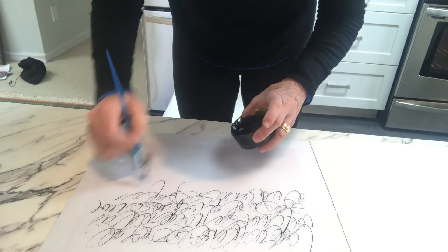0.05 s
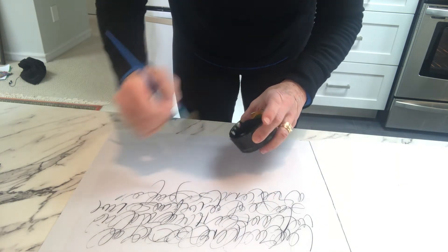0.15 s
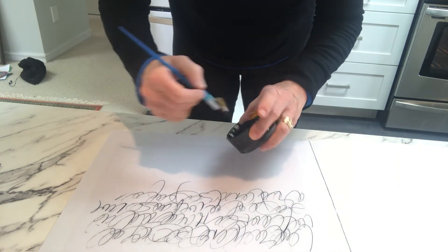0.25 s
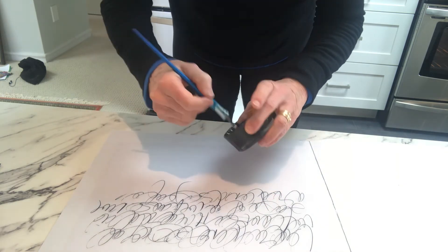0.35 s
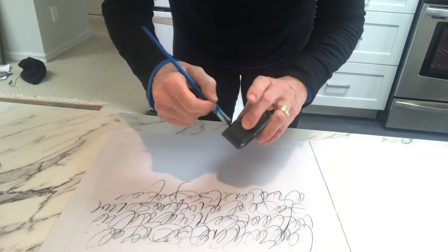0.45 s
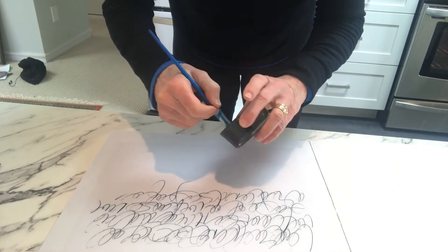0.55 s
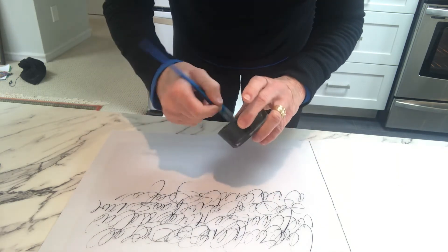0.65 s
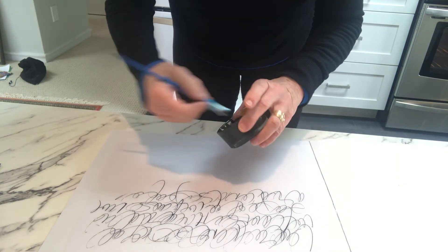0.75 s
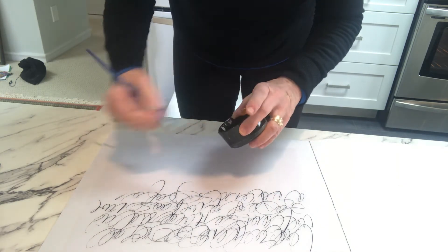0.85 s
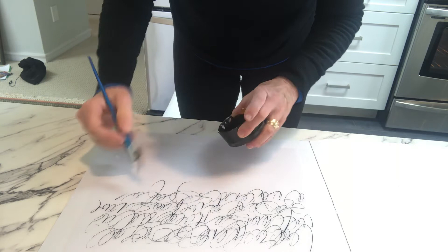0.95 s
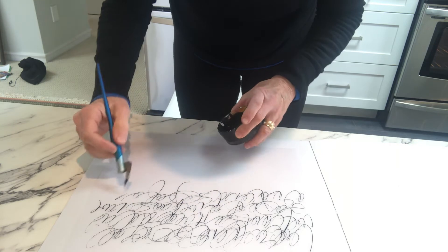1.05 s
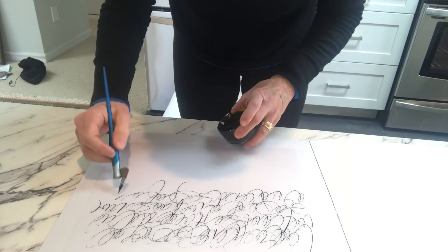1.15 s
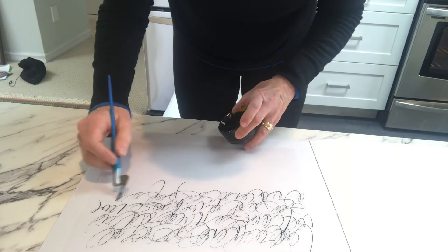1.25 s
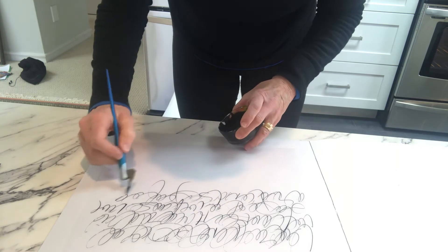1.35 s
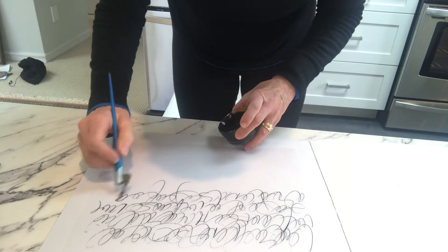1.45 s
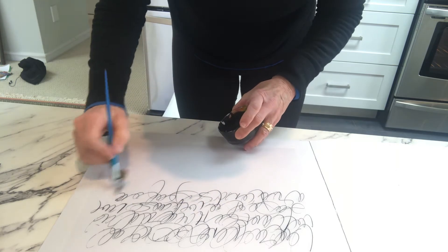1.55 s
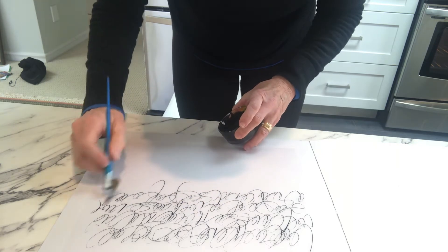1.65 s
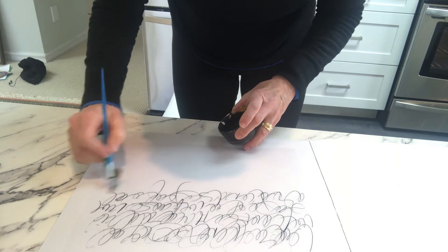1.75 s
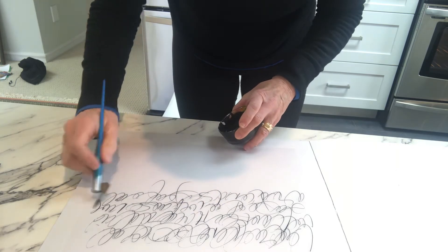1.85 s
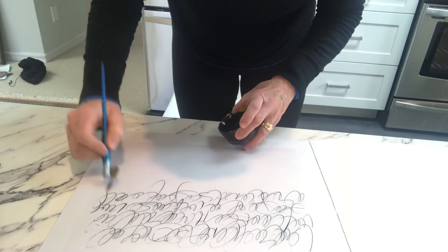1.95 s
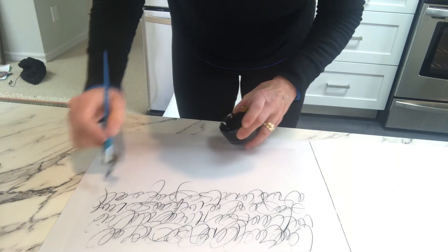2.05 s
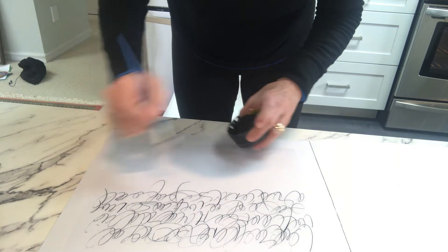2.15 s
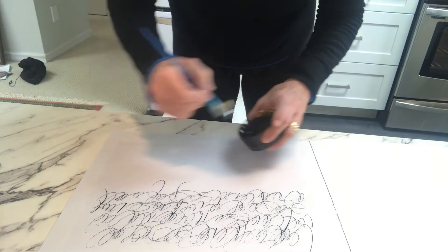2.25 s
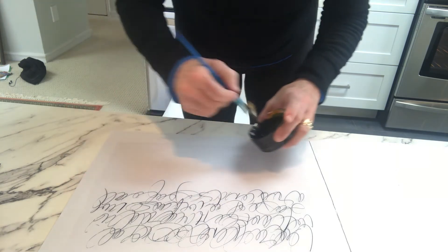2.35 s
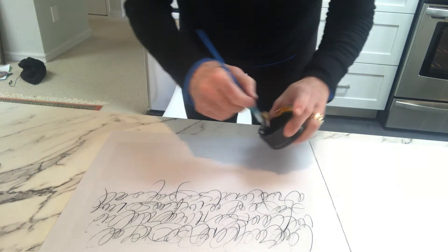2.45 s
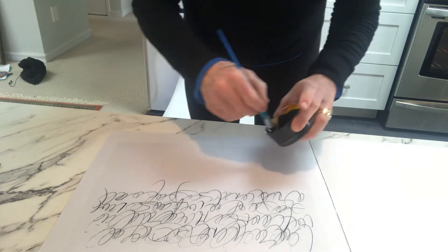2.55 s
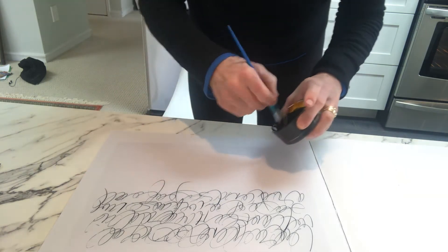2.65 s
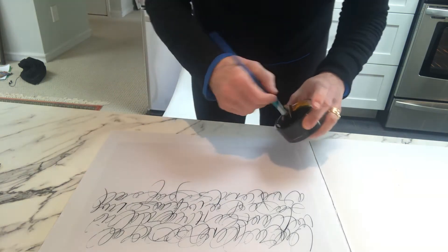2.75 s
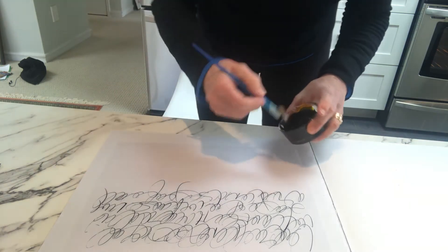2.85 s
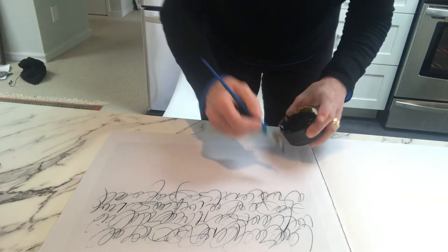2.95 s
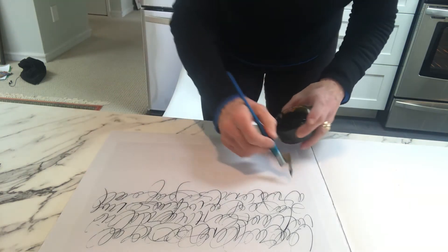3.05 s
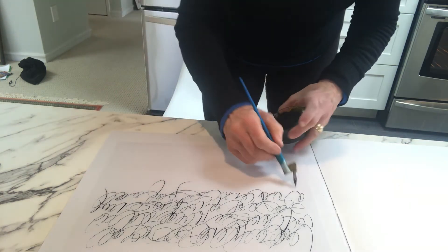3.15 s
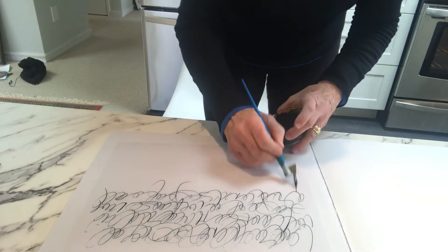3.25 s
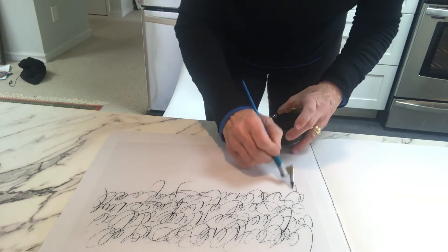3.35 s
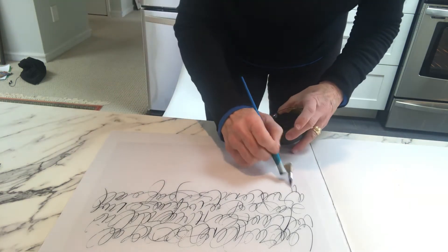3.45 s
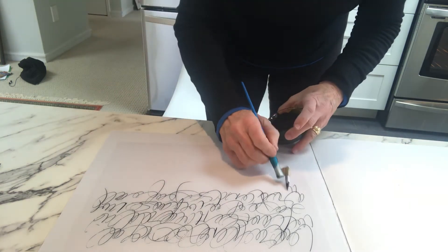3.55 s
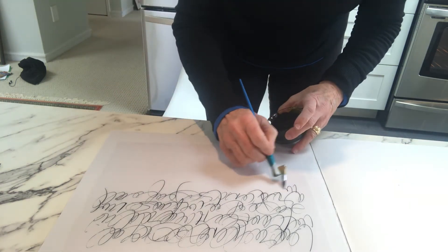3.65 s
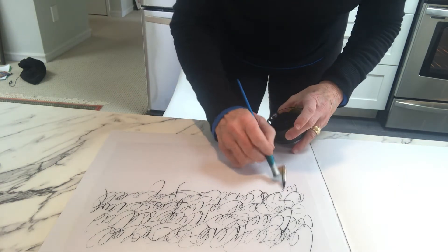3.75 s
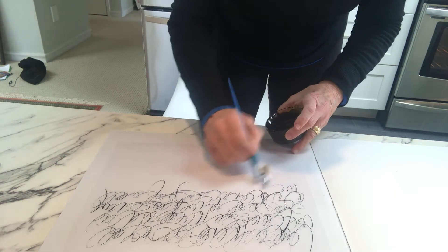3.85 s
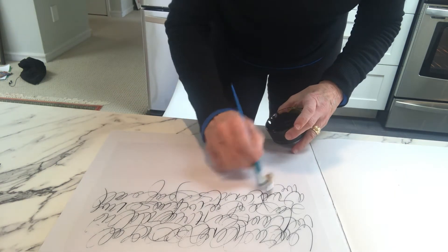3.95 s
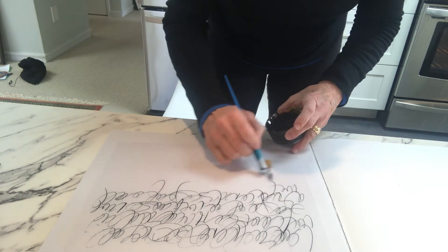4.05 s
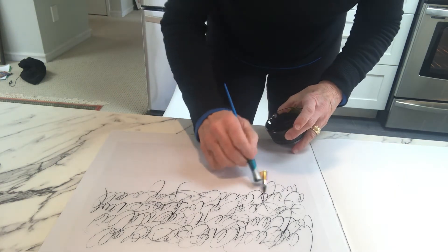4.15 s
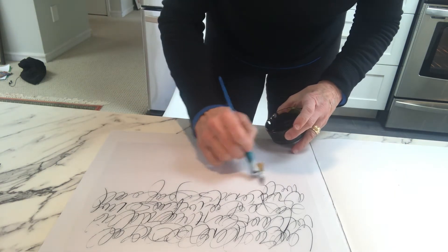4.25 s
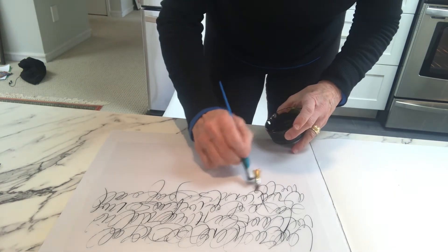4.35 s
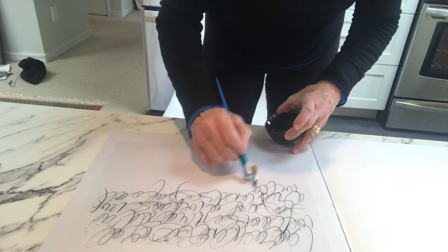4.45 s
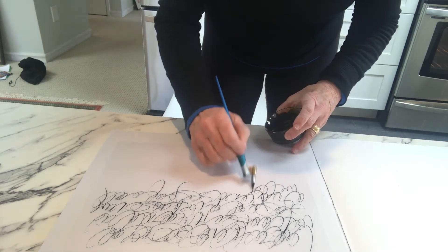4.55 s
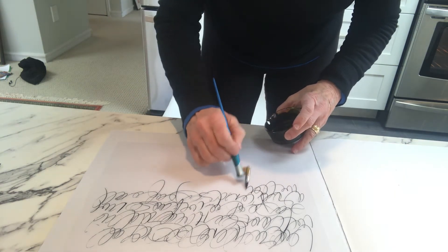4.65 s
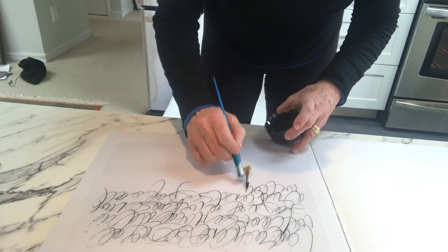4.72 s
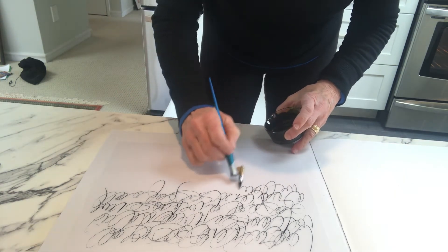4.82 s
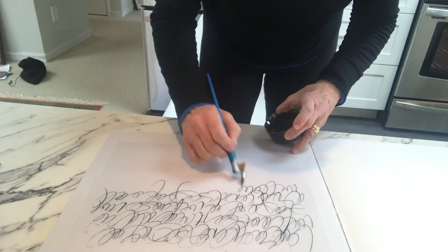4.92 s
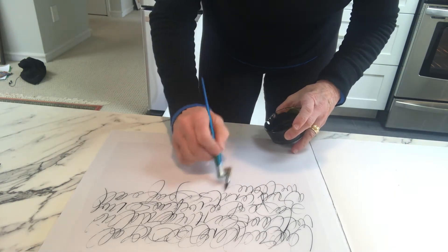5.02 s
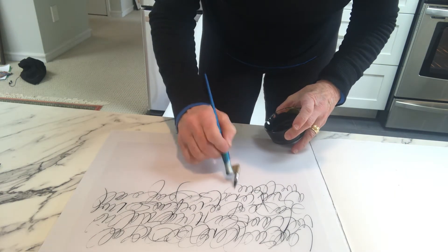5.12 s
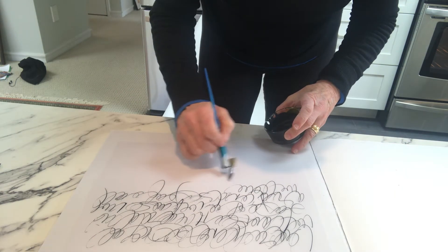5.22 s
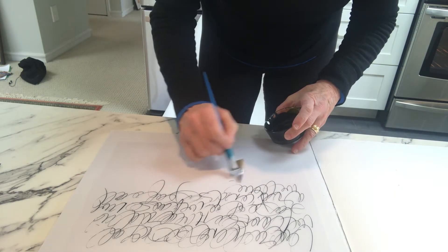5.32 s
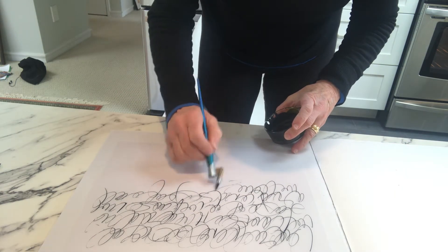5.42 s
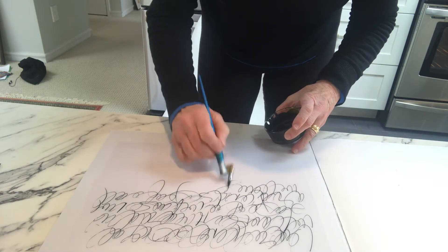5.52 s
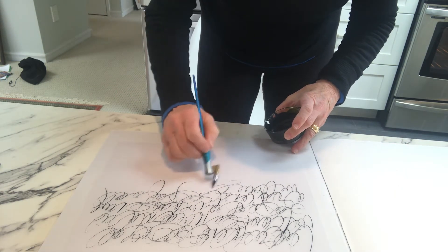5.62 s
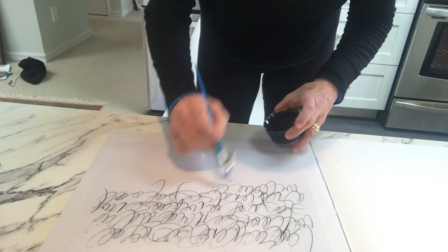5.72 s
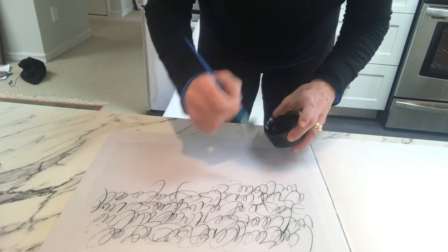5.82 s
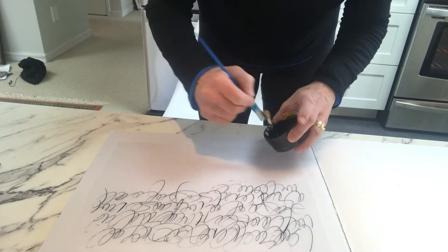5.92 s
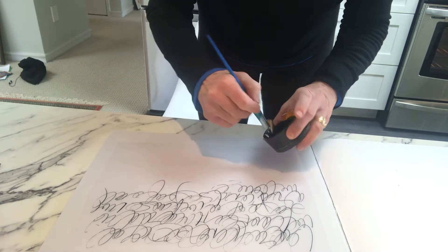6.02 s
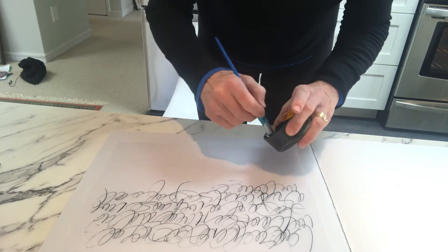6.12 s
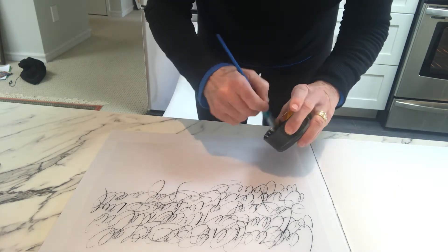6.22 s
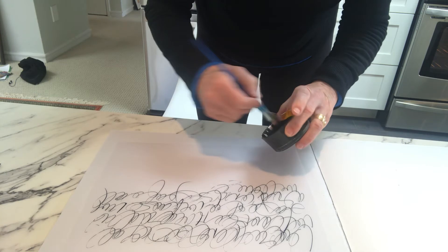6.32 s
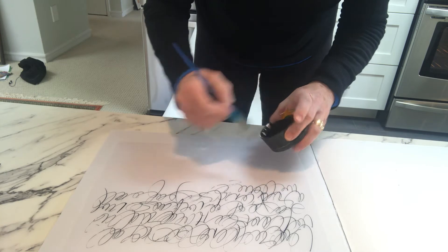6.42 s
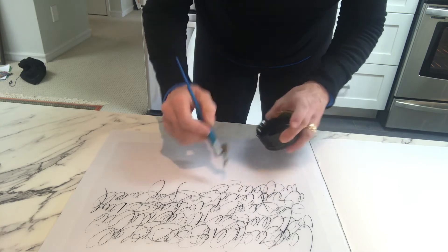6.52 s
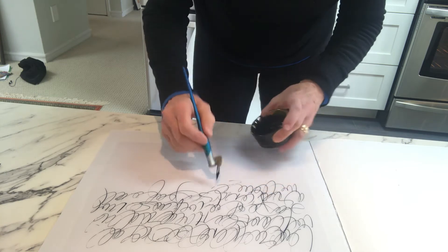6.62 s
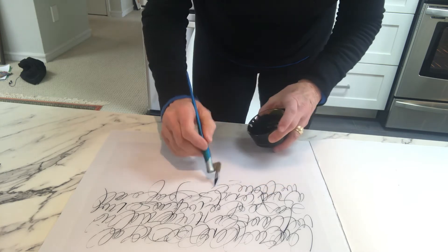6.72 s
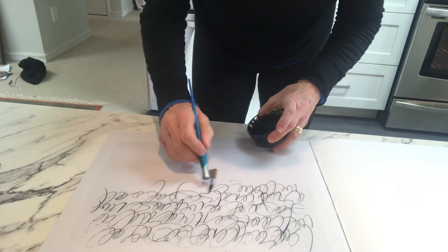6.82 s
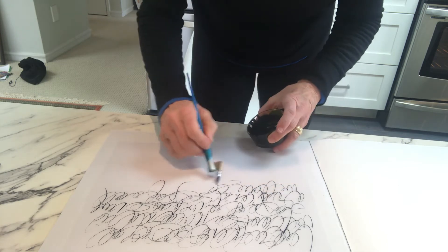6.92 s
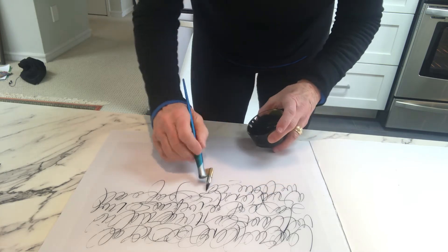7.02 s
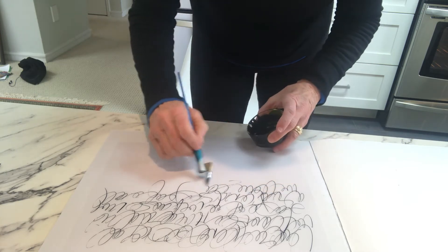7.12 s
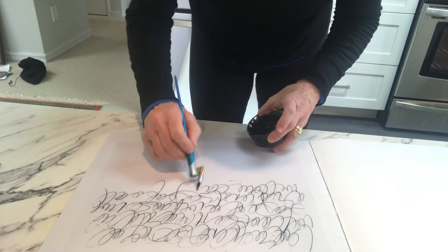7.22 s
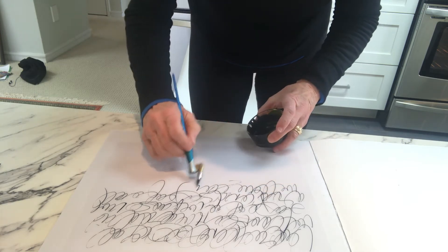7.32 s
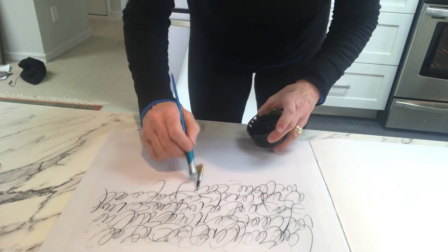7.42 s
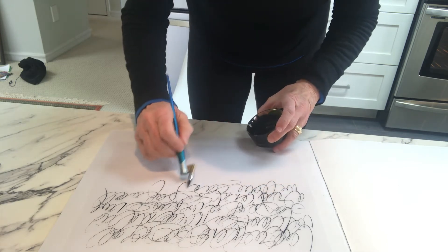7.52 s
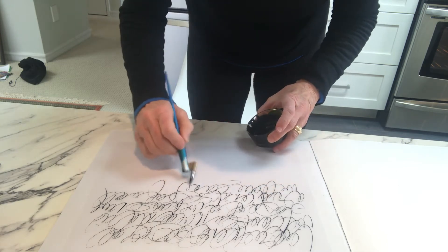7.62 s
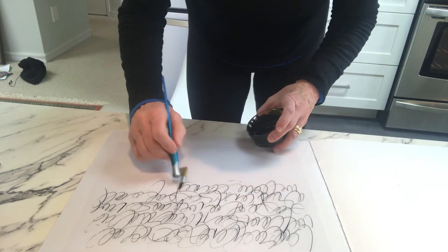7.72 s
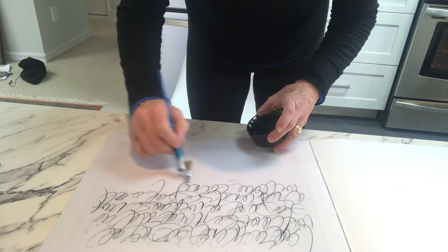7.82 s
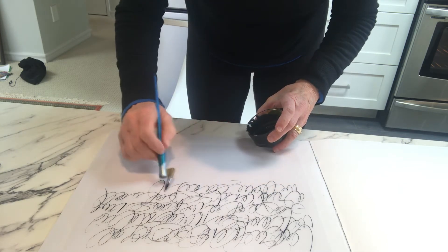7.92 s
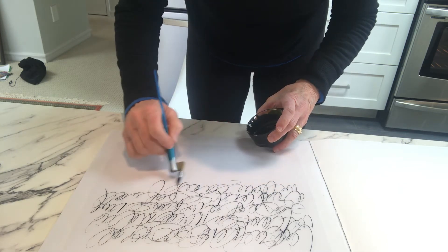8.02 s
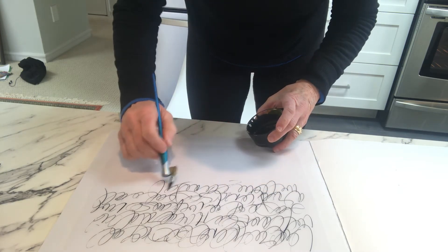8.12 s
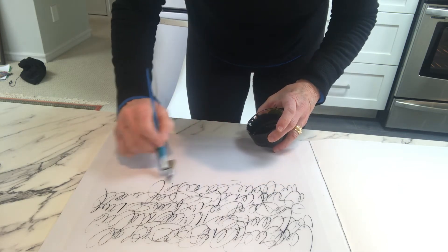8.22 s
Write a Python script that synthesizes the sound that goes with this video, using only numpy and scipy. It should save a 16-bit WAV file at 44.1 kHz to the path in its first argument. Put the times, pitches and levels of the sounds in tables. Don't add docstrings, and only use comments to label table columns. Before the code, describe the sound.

A quiet kitchen with soft low room air and distant appliance hum, captured close at a stone counter. At 0 s a very faint last touch of nib on paper, then near silence until small clinks and a dull scrape on an ink pot around 0.5-0.6 s. From 1.2 to 1.95 s the steel nib scribbles quick loops: short raspy strokes with a hollow midrange hum, gritty hiss, ticks and tiny stick-and-jump chirps. A soft sleeve swish passes at 2.25 s, and sharper, briefly ringing pot clinks fall at 2.5-2.65 s. From 3.2 to 5.6 s comes the longest run, five to ten uneven strokes per second, getting slightly brighter. A pause, then rattling taps on the pot at 6.1-6.25 s, the hardest at 6.2. Scribbling resumes at 6.75 s, lighter and steady, continuing to about 8.25 s. Reflections are short and faint.

```python
import sys
import numpy as np
from scipy import signal
from scipy.fft import rfft, irfft, next_fast_len
from scipy.io import wavfile
from scipy.ndimage import uniform_filter1d

SR = 44100
rng = np.random.default_rng(int(sys.argv[2]) if len(sys.argv) > 2 else 0)


def master(y):
    cut = np.clip(np.atleast_2d(y).T, -1, 1)
    pcm = np.round(cut * 32767)
    wavfile.write(sys.argv[1], SR, pcm.astype(np.int16))


def invert_db(level):
    return 10 ** (np.asarray(level, dtype=float) / 20)


N = 364707

# frequency in Hz, level in dB per Hz.
AIR = [(13, -63), (22, -32), (49, -8), (70, -3), (92, -8), (164, -7.5), (194, -7), (408, -11), (669, -15),
       (835, -15.5), (1370, -19), (1620, -22), (2440, -24.5), (12100, -36), (15900, -39.5)]
AIR_DB = -66
# centre in Hz, width in Hz, change in dB.
MIC_DIPS = [(5000, 500, -3), (10550, 800, -4.5)]
# pitch in Hz, width in Hz, level in dB.
HUM = [(69, 6, -76), (415, 4, -77.5)]
# frequency in Hz, time to fall 60 dB in seconds.
ROOM = [(500, 1), (1300, 0.3), (4000, 0.29), (12000, 0.18)]
EDGE_HZ = 15830

# time in seconds, rise in ms, fall in ms, level in dB.
SWISHES = [
    (2.263, 76, 76, -60),
    (2.9, 25, 47, -80),
    (.25, 80, 80, -103),
    (5.8, 49, 280, -78),
]
# frequency in Hz, level in dB per Hz.
CLOTH = [(470, -35), (800, -8), (965, 2), (1050, -14), (1210, -1.5), (5360, -7), (15900, -20.5)]

# start in seconds, rasp in dB, pot ring in dB, contact in ms.
CLINKS = [(.501, -59, -82, 4), (.508, -50, -64, 3.1), (0.575, -55, -76, 25), (.604, -50, -78, 4.5),
          (2.504, -51, -62, 5.6), (2.51, -60, -74, 3.8), (2.5336, -46, -34, 4.5), (2.535, -41, -66, 8.9),
          (2.603, -56.5, -87, 25), (2.625, -49, -53, 1.7), (2.652, -65, -62.5, 19), (2.742, -76, -69, 6.5),
          (6.108, -49.5, -79, 4), (6.157, -59, -73, 3.2), (6.176, -48, -60, 7.8),
          (6.2019, -35.5, -34.5, 4.3), (6.21, -44, -43.5, 12), (6.238, -54, -57, 19), (6.325, -76, -66, 24)]
POT_HZ = [3526, 3524, 3552, 6090, 7470, 3020]
# level in dB, time to fall 60 dB in seconds.
POT_MODES = [(7.5, 0.062), (-17, 0.52), (-33, .2), (-22, .12), (-24, .09), (-24, .2)]
# frequency in Hz, level in dB per Hz.
RASP = [(1200, -12), (2500, 14), (4000, 10.5), (8000, 10.5), (15900, 9)]
# frequency in Hz, width in Hz, rise in dB.
RIM = [(3550, 250, 6), (4450, 250, 7), (6110, 250, 11), (7650, 300, 10), (9000, 300, 5), (10900, 400, 9),
       (13900, 400, 8), (15400, 400, 7)]
# start in seconds, pitch in Hz, level in dB, contact in ms.
CLACKS = [(.578, 6130, -67, 33), (.578, 4400, -69, 16), (.578, 7500, -66, 22), (.606, 11200, -63, 3.7),
          (2.504, 2810, -53.5, 2.8), (2.507, 2580, -63, 3.2), (2.536, 2980, -48.5, 8.2),
          (2.504, 6100, -64, 7.1), (2.504, 7000, -62, 5.5), (2.504, 4370, -68, 6), (2.537, 7060, -57, 6),
          (6.177, 5900, -62, 6), (2.538, 6070, -44.5, 4.5), (2.624, 2780, -53, 2.5), (2.625, 3555, -42, 4),
          (2.625, 2290, -61, 2.6), (2.625, 1460, -58.5, 4.2), (2.61, 7460, -63, 22), (2.882, 1170, -69, 33),
          (6.163, 2170, -69, 6.4), (6.169, 2370, -59, 5.4), (6.177, 2560, -48.5, 4.7),
          (6.177, 7600, -59, 6), (6.177, 10600, -67, 5), (6.203, 990, -65, 7.3), (6.108, 3850, -62, 6),
          (6.108, 3050, -65, 6), (6.235, 7400, -62, 18), (6.255, 4550, -64, 12), (6.209, 4490, -51, 9.6),
          (6.213, 6070, -48.5, 5.1), (6.243, 7000, -58.5, 18), (6.238, 10600, -65, 15)]
# start in seconds, pitch in Hz, level in dB, contact in ms.
SCUFFS = [
    (.505, 1400, -59, 11),
    (.501, 6700, -57, 4.4),
    (.553, 1300, -62, 25),
    (.572, 895, -54, 30),
    (.585, 2200, -62, 25),
    (.577, 1425, -54.5, 34),
    (1.164, 5040, -50, 16),
    (6.201, 4040, -38, 6.4),
]
NOTE_WIDTH_HZ, NOTE_DAMPING = 144, 0.013
SCUFF_WIDTH_HZ, SCUFF_DAMPING = 340, 0.23

# time of top speed in seconds, length in ms,
# pressure in dB, scratch in dB re pressure.
BITES = [(.004, 18, -59.5, -6.5), (.04, 76, -68.5, -8), (1.336, 35, -40.5, -8), (1.423, 35, -45.5, -6.5),
         (1.577, 27, -47.5, -28), (1.637, 55, -46, -3.5), (1.722, 42.5, -40.5, -5), (3.253, 28.4, -41, -10),
         (3.33, 32, -40.5, -9), (3.424, 31, -49.5, -8.5), (3.969, 56, -49.5, 2.5), (4.067, 28, -36.5, -10),
         (4.11, 26, -44.5, -8), (4.192, 62, -44.5, -11), (4.554, 37, -46, -11), (4.728, 50, -49, -11.5),
         (4.899, 55, -47, -11), (5.08, 42, -46, -8.5), (5.24, 39, -45.5, -9.5), (5.406, 19, -41.5, -9),
         (6.733, 11, -71, 5), (6.765, 38, -43, -13.5), (7.068, 26, -47.5, -12), (7.242, 26.5, -45, -15),
         (7.417, 28, -47.5, -10.5), (7.591, 31, -48.5, -10.5), (8.154, 42, -50, -6.5)]
LOOPS = [(1.25, 35, -44, -5.5), (1.53, 40.3, -39.5, -5.5), (1.837, 43, -45, -16), (1.888, 41, -60.5, 13),
         (3.203, 7.7, -55.5, -7), (3.518, 30.5, -38.5, -17.5), (3.814, 36, -41, -15.5),
         (3.848, 49, -52, 4.5), (4.014, 72, -45, -23), (4.271, 23, -43, -7.5), (4.278, 44, -39.5, -16.5),
         (4.374, 31, -42.5, -13.5), (4.463, 31, -40, -14), (4.635, 30, -39.5, -16.5),
         (4.801, 36, -41.5, -14), (4.988, 31, -48, -4), (5.019, 19.5, -40, -13.5), (5.362, 28.5, -36, -9),
         (5.457, 27, -44.5, -18), (5.491, 34, -45, -7.5), (5.583, 32, -43, -6), (5.699, 12, -70, -0.5),
         (6.871, 27.4, -43, -9.5), (6.963, 43.4, -44.5, -12), (7.34, 30, -45, -14.5),
         (7.685, 39.4, -41, -13), (7.867, 45.4, -40.5, -8.5), (7.984, 27.7, -44.5, -8),
         (8.068, 26, -39.5, -12), (8.239, 30, -42, -7.5)]
STOPS = [(1.218, 30, -50, -11), (1.79, 41, -55, 4), (1.932, 9.3, -50.5, 0), (3.477, 28, -51, -17),
         (3.665, 37, -40, -17.5), (3.763, 31, -47, -12), (5.178, 28.5, -45, -6.5),
         (7.169, 47.5, -43, -12.5), (7.513, 54, -42, -13), (7.794, 34, -51.5, -8), (8.216, 37, -48, -27)]
BITE_RISE, LOOP_RISE, STOP_FALL = 0.35, 0.86, 0.49
SQUARENESS = 2.84
# start in seconds, end in
# seconds, second bend in dB at the start, the same at the end, lean on the counter in dB.
RUNS = [
    (0, .1, 2, -12, -1),
    (1.16, 1.953, -15, -0.5, 2.5),
    (3.19, 5.724, -20.5, -1.5, 1),
    (6.733, 8.27, -9.5, -2, 1),
]
EASE_DB = -4.5

# time in seconds, unloaded first bend in Hz,
# tilt from -1 (flat and heavy) to +1 (steep and light).
GRIP = [(.1, 1230, -0.74), (1.4, 1294, -0.068), (1.7, 1270, 0.032), (1.96, 1410, -0.39),
        (3.18, 1220, -0.56), (3.6, 1250, -0.12), (4.03, 1303, 0.63), (4.18, 1350, 0.06), (4.32, 1330, 0.44),
        (4.7, 1330, -0.11), (5.0, 1370, 0.51), (5.6, 1310, 0.79), (6.72, 1300, 0.62), (7.1, 1310, 0.73),
        (7.27, 1390, -0.0046), (7.6, 1310, 0.11), (7.9, 1330, 0.57), (8.15, 1383, -0.045)]
# time in seconds, swing from 0 to 1.
TOPS = [(1.03, 0.3), (1.252, 0.8), (1.487, 0.4), (1.681, 0), (1.941, 0.8), (3.268, 0.22), (3.452, 0.2),
        (3.649, 0.1), (3.826, 0.5), (3.986, 0), (4.111, 0.2), (4.255, .6), (4.45, 0.3), (4.629, 0.64),
        (4.77, 0.55), (4.954, 0), (5.178, 0.23), (5.353, 0), (5.567, 0.5), (5.76, 0.7), (6.66, 1),
        (6.86, 0.5), (7.11, 0.3), (7.275, 0.05), (7.47, 0.63), (7.643, 0.95), (7.837, 0.74), (7.99, 0.1),
        (8.221, 0.65), (8.4, .8)]
SWING_HZ, SWING_LEAD_TURNS, SWING_TILT = 110, 0.084, 0.92
SAG_HZ, FULL_PRESSURE_DB = 47, -39

BEND_WIDTHS_HZ = (205, 796)
BEND_FLOOR_HZ = 1157
SECOND_HZ, SECOND_TILT_HZ, SECOND_TILT_DB = 1760, 166, 4.5
# frequency in Hz, level in dB per Hz.
PAPER_BODY = [(120, -4), (300, -0.5), (550, -2), (900, 6), (1450, 10.5), (2400, -13.5), (3500, -33)]
WEIGHT_DB, WEIGHT_TILT_DB = -13, -7
# frequency in Hz, level in dB per Hz.
SCRATCH = [(1470, -78), (2600, -7), (3130, -7.5), (3620, -8), (3950, -8.5), (4790, -11.5), (6040, -10),
           (9470, -20.5), (10100, -17.5), (11900, -15.5), (15900, -24)]
TINES_HZ = [3110, 3500, 3930, 4550, 5520, 6110, 6960, 7600, 10330, 11750, 12100, 12800, 13400, 15600]
TINES_NEAR_DB = [0, 1, 4, 2, 3.5, 6, 5, 2, 5.5, 6, 6.5, 5.5, 5.5, 6]
TINES_FAR_DB = [0, 4, 7.5, 5.5, 1, 7, 4.5, 6, 5.5, 6, 5, 3, 3, 5]
TINE_WIDTH_HZ, STRETCHED_UNTIL_S = 200, 2.5
BRIGHT_DB_PER_OCTAVE = 4.5
# time in seconds, pitch in Hz, level in dB re pressure.
TWIST = [(1.25, 3200, -25), (1.53, 3190, -18), (1.9, 3180, -32), (3.3, 3120, -17.5), (3.52, 3050, -20),
         (3.8, 3010, -23), (3.98, 3000, -17), (4.08, 3100, -27.5), (4.8, 3140, -20), (5.0, 2980, -22),
         (5.25, 3070, -15.5), (5.37, 3020, -20), (5.59, 3010, -9.5), (6.77, 2980, -24), (7.3, 3030, -19),
         (7.68, 3020, -24.5), (7.87, 3030, -19), (8.23, 3030, -16.5)]
# time in seconds, pitch in Hz, level in dB re pressure.
CLIP = [(1.25, 1850, -19), (1.53, 1950, -13.5), (1.73, 2010, -11.5), (1.92, 2010, -9), (3.3, 2040, -18),
        (3.8, 2150, -21), (4.08, 2180, -13), (4.28, 2160, -19), (4.47, 2090, -12), (4.801, 2080, -19),
        (5.17, 2130, -14), (5.37, 2110, -26), (5.6, 2050, -18), (6.8, 2010, -20), (7.3, 2030, -15),
        (7.68, 2000, -15.5), (7.88, 2010, -24), (8.23, 1950, -9)]
TWIST_WIDTH_HZ, CLIP_WIDTH_HZ = 530, 340

# start in seconds, tick in dB, hum in dB.
SNAGS = [(1.166, -56, -74), (1.184, -49, -47.5), (1.2132, -52, -38), (1.3239, -41, -61), (3.196, -59, -62),
         (3.2312, -39, -42.5), (3.253, -41, -35), (3.32, -52, -34), (3.3649, -51, -33), (3.375, -45, -33),
         (3.442, -43, -53), (3.503, -61, -29.5), (3.813, -52, -33.5), (3.818, -52, -30), (4.062, -40, -29),
         (5.2309, -45, -36), (5.319, -59, -39), (5.4488, -51, -35), (5.6994, -66, -70), (6.7344, -63, -65),
         (6.7521, -60, -37.5), (7.0474, -53, -42), (7.231, -56, -41.5), (1.417, -56, -41),
         (3.645, -56, -32.5), (3.749, -41, -37.5), (4.243, -54, -39), (5.155, -53, -43), (4.433, -54, -41),
         (4.612, -54, -41), (3.489, -57, -38), (3.796, -54, -35.5), (7.401, -58, -42), (7.829, -54, -37.5)]
# start in seconds, level in dB, pitch in Hz.
SLIPS = [(1.2616, -44, 1350), (1.3297, -33, 1213), (1.3544, -34, 1250), (1.5007, -33, 1300),
         (1.5115, -38, 1370), (1.5472, -37, 1290), (1.5586, -46, 1360), (1.578, -35.5, 1380),
         (1.669, -43, 1360), (1.713, -36, 1260), (1.842, -44, 1510), (3.3275, -45, 1200),
         (3.5107, -33, 1290), (3.5472, -33, 1300), (3.6597, -35, 1313), (3.8563, -38, 1294),
         (3.9928, -37, 1370), (4.0756, -47, 1240), (4.177, -42, 1330), (4.255, -39, 1370),
         (4.2635, -31, 1335), (4.2835, -30, 1330), (4.297, -37, 1345), (4.306, -37, 1350),
         (4.388, -43, 1400), (4.4622, -42, 1340), (4.4722, -33.5, 1290), (4.6455, -40, 1306),
         (4.7968, -32, 1295), (4.8212, -36, 1284), (4.9815, -36.5, 1255), (5.014, -43, 1380),
         (5.03, -44, 1335), (5.2601, -39, 1450), (5.3272, -39, 1347), (5.3376, -33, 1290),
         (5.3482, -38, 1330), (5.3599, -31, 1370), (5.3713, -31, 1266), (5.4015, -33, 1294),
         (5.4286, -35, 1310), (5.5126, -40, 1440), (5.571, -34.5, 1440), (5.6213, -41.5, 1370),
         (6.9534, -36, 1290), (6.9596, -38, 1276), (6.9666, -38, 1246), (6.9942, -39, 1246),
         (7.1845, -36, 1320), (7.2455, -41, 1386), (7.328, -39, 1360), (7.3537, -40, 1420),
         (7.5359, -36.5, 1225), (7.683, -38, 1430), (7.703, -38, 1410), (7.836, -37, 1450),
         (7.866, -42, 1325), (8.048, -43, 1410), (8.0752, -49, 1360), (8.0959, -42, 1245)]
SLIP_RISE_S = 0.0029
STICK_MS, STICK_SHARE = 4.3, 0.42
JOLT, JOLT_MS = 0.35, 2.45
PULL, PULL_MS = 0.67, 11


def evened(x):
    return x / np.sqrt(np.mean(x ** 2) + 1e-20)


def peaked(x):
    return x / abs(x).max()


def read(points, hz):
    f, value = np.transpose(points)
    return np.interp(np.log(hz + 1), np.log(f + 1), value)


def coloured(x, points, peaks=()):
    size = next_fast_len(N)
    hz = np.fft.rfftfreq(size, 1 / SR)
    db = read(points, hz)
    for f, width, rise_db in peaks:
        db = db + rise_db / (1 + (2 * (hz - f) / width) ** 2)
    return evened(irfft(rfft(x, size) * invert_db(db), size)[:N])


def resonate(x, hz, width):
    turn = np.exp(2j * np.pi * np.cumsum(hz * np.ones(len(x))) / SR)
    r = np.exp(-np.pi * width / SR)
    return 2 * (turn * signal.lfilter([1 - r], [1, -r], x / turn)).real


def twice(x, hz, width):
    return resonate(resonate(x, hz, width), hz, width)


def swells(s, rise_ms, fall_ms, db):
    t = np.arange(0, N + 32, 32) / SR
    late = t - s[:, None]
    spread = np.where(late < 0, rise_ms[:, None], fall_ms[:, None]) / 1000
    bells = np.exp(-abs(late / spread) ** SQUARENESS)
    power = (invert_db(db)[:, None] ** 2 * bells).sum(0)
    return np.interp(np.arange(N) / SR, t, np.sqrt(power))


def add(mix, s, sound):
    part = mix[round(s * SR):][:len(sound)]
    part += sound[:len(part)]


def fibres(clump_ms, clump_db):
    clumps = evened(uniform_filter1d(rng.standard_normal(N), round(clump_ms * SR / 1000)))
    return evened(rng.standard_normal(N) * invert_db(clump_db * clumps))


def air():
    out = invert_db(AIR_DB) * coloured(rng.standard_normal(N), AIR, MIC_DIPS)
    for hz, width, db in HUM:
        out += invert_db(db) * evened(resonate(rng.standard_normal(N), hz, width))
    return out


def kitchen(x):
    taps = np.zeros(SR // 2)
    at = np.arange(150, SR // 2 - 20, 20)
    taps[at + rng.integers(0, 20, len(at))] = rng.choice([-1., 1.], len(at))
    hz, t, z = signal.stft(taps, SR, nperseg=256)
    decay = invert_db(-60 * t / read(ROOM, hz)[:, None])
    tail = signal.istft(z * decay, SR, nperseg=256)[1]
    return signal.fftconvolve(x, tail / np.linalg.norm(tail))[:N]


def sleeve():
    return coloured(fibres(clump_ms=13.0, clump_db=1.5), CLOTH) * swells(*np.transpose(SWISHES))


def contact(puff, ms):
    u = np.arange(len(puff)) * 1000 / SR / ms
    return puff * np.minimum(u / .15, 1) * np.exp(-u ** 3)


def pot_ring():
    t = np.arange(SR // 2) / SR
    return peaked(sum(invert_db(db - 60 * t / t60) * np.sin(2 * np.pi * hz * t)
                      for hz, (db, t60) in zip(POT_HZ, POT_MODES)))


def pot():
    out, rasp, body = np.zeros(N), np.zeros(N), pot_ring()
    in_step = np.sin(2 * np.pi * POT_HZ[0] * np.arange(2500) / SR)
    for s, rasp_db, ring_db, ms in CLINKS:
        add(rasp, s, contact(np.ones(2500), ms) * invert_db(rasp_db - 7))
        push = contact(in_step + 0.7 * rng.standard_normal(2500), ms)
        add(out, s, peaked(signal.fftconvolve(push, body)) * invert_db(ring_db + 0.5))
    return out + rasp * coloured(fibres(clump_ms=0.89, clump_db=-3.0), RASP, RIM)


def nib_on_rim():
    out = np.zeros(N)
    kinds = ((CLACKS, NOTE_WIDTH_HZ, NOTE_DAMPING), (SCUFFS, SCUFF_WIDTH_HZ, SCUFF_DAMPING))
    for table, base_hz, damping in kinds:
        for s, hz, db, ms in table:
            width = base_hz + damping * hz
            tone = np.sin(2 * np.pi * hz * np.arange(2500) / SR)
            bounce = rng.standard_normal(2500) + 40 / width * tone
            add(out, s, peaked(twice(contact(bounce, ms), hz, 1.2 * width)) * invert_db(db + 2.5))
    return out


def strokes():
    shapes = ((BITES, BITE_RISE, 1), (LOOPS, LOOP_RISE, 1), (STOPS, 1, STOP_FALL))
    return np.transpose([(s, rise * ms, fall * ms, db, scratch_db) for table, rise, fall in shapes
                         for s, ms, db, scratch_db in table])


def swing(t, lead=0.):
    s, size = np.transpose(TOPS)
    turns = np.interp(t, s, np.arange(len(s))) + lead
    return np.interp(t, s, size) * np.cos(2 * np.pi * turns)


def tilt_at(t):
    when, _, steep = np.transpose(GRIP)
    return np.interp(t, when, steep) + SWING_TILT * swing(t)


def jumps(ms):
    s = np.transpose(SLIPS)[0] + SLIP_RISE_S
    spread = np.full(len(s), ms)
    return np.minimum(swells(s, spread, spread, 0 * s), 1)


def sticking():
    caught = [s - .0055 for s, _, hum_db in SNAGS if hum_db > -46]
    s = np.array([row[0] for row in SLIPS] + caught)
    ms = np.full(len(s), STICK_MS)
    return 1 - STICK_SHARE * np.minimum(swells(s + 0.0028, ms, ms, 0 * s), 1)


def first_bend():
    s, rise, fall, db, _ = strokes()
    t = np.arange(N) / SR
    when, hz, _ = np.transpose(GRIP)
    sag = SAG_HZ * swells(s, rise, fall, db - FULL_PRESSURE_DB)
    bend = np.interp(t, when, hz) + SWING_HZ * swing(t, SWING_LEAD_TURNS) - sag
    slip_s, _, slip_hz = np.transpose(SLIPS)
    return bend + PULL * jumps(PULL_MS) * (np.interp(t, slip_s, slip_hz) - bend)


def snags(bend):
    out, t = np.zeros(N), np.arange(800) / SR
    for s, db, hum_db in SNAGS:
        puff = np.diff(rng.standard_normal(800), prepend=0)
        tick = puff * np.exp(-t / .0012) * invert_db(min(db, -41) - 8)
        kick = (t / 0.0023) * np.exp(1 - t / 0.0022) * invert_db(hum_db + 1)
        add(out, s, tick + kick * np.sin(2 * np.pi * bend[round(s * SR)] * t))
    return out


def slips():
    out, t = np.zeros(N), np.arange(900) / SR
    u = t / SLIP_RISE_S
    for s, db, hz in SLIPS:
        add(out, s, np.sin(2 * np.pi * hz * t) * u ** 2 * np.exp(2 - 2 * u) * invert_db(db))
    return out


def crackle(per_s, spread_db):
    chance, size, sign = rng.random((N, 3)).T
    clicks = (chance < per_s / SR) * invert_db(-spread_db * np.log(size + 0.013))
    return evened(clicks * np.sign(sign - .5))


def rider(grain, curve, width):
    t = np.arange(N) / SR
    when, hz, db = np.transpose(curve)
    return evened(twice(grain, np.interp(t, when, hz), width)) * invert_db(np.interp(t, when, db))


def shifting(x, patchy_db):
    hz, t, z = signal.stft(x, SR, nperseg=256)
    patches = uniform_filter1d(rng.standard_normal(z.shape), size=3, axis=0)
    patches = evened(uniform_filter1d(patches, size=22, axis=1))
    octaves = np.log2((hz[:, None] + 1) / 7000).clip(-2, 2)
    gain = invert_db(octaves * BRIGHT_DB_PER_OCTAVE * tilt_at(t) + patchy_db * patches)
    power = (abs(z) ** 2).mean(1, keepdims=True)
    gain /= np.sqrt((power * gain ** 2).sum(0) / power.sum())
    return signal.istft(z * gain, SR, nperseg=256)[1][:N]


def tine_scratch(grain):
    near, far = (coloured(grain, SCRATCH, [(hz, TINE_WIDTH_HZ, db) for hz, db in zip(TINES_HZ, tines_db)])
                 for tines_db in (TINES_NEAR_DB, TINES_FAR_DB))
    return shifting(np.where(np.arange(N) / SR < STRETCHED_UNTIL_S, far, near), patchy_db=3.4)


def first_hum(drag, pressure, bend):
    width = BEND_WIDTHS_HZ[0]
    hum = twice(drag * pressure * sticking(), bend, width) / np.std(twice(drag, 1300, width))
    floor = signal.butter(N=6, Wn=BEND_FLOOR_HZ, btype="high", fs=SR, output="sos")
    return signal.sosfilt(floor, hum)


def nib(bend):
    s, rise, fall, first_db, scratch_db = strokes()
    pressure = swells(s, rise, fall, first_db - .5)
    speed = swells(s, rise, fall, first_db + scratch_db - .5)
    t, runs = np.arange(N) / SR, np.array(RUNS)
    tilt, run_s = tilt_at(t), runs[:, :2].ravel()
    second_db = np.interp(t, run_s, runs[:, 2:4].ravel()) + SECOND_TILT_DB * tilt
    lean_db = np.interp(t, run_s, (runs[:, 4:] + [0, EASE_DB]).ravel())

    drag = fibres(clump_ms=7.9, clump_db=0.5)
    grain = fibres(clump_ms=1.1, clump_db=1.5) + invert_db(-8) * crackle(per_s=500., spread_db=-3.0)
    grain = evened(grain) * (1 + JOLT * jumps(JOLT_MS))

    weight = invert_db(WEIGHT_DB + lean_db + WEIGHT_TILT_DB * tilt)
    body = coloured(drag, PAPER_BODY, [(857, 110, 4.1)]) * pressure * weight
    second = evened(twice(grain, SECOND_HZ + SECOND_TILT_HZ * tilt, BEND_WIDTHS_HZ[1]))
    second *= invert_db(second_db - 3.0) * np.hypot(0.74 * pressure, 1.4 * speed)
    riders = rider(grain, TWIST, TWIST_WIDTH_HZ) + rider(grain, CLIP, CLIP_WIDTH_HZ)
    return first_hum(drag, pressure, bend) + body + second + tine_scratch(grain) * speed + riders * pressure


def scene():
    bend = first_bend()
    pen = nib(bend) + snags(bend) + slips()
    clinks = pot() + nib_on_rim()
    reflections = kitchen(invert_db(-10.5) * pen + invert_db(-12.0) * clinks)
    return np.tile(air() + reflections + sleeve() + clinks + pen, (2, 1))


def band_limit(x):
    return signal.sosfilt(signal.butter(12, 16490, fs=SR, output="sos"), x)


def record(dry):
    edge = signal.firwin(1023, EDGE_HZ, window=("kaiser", 9), fs=SR)
    mix = signal.oaconvolve(dry, edge[None], "same")
    return band_limit(mix)


dry = scene()
out = record(dry)
master(out)
```